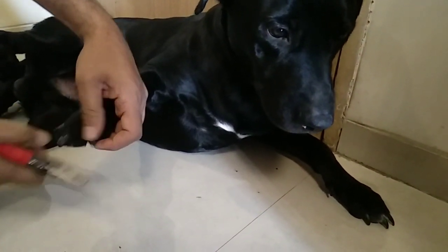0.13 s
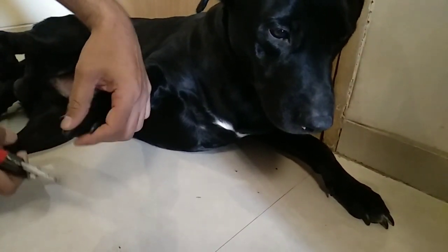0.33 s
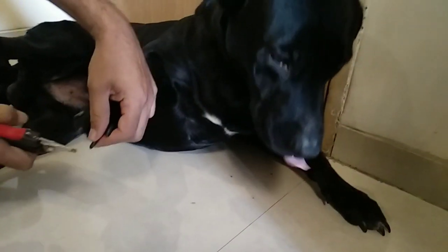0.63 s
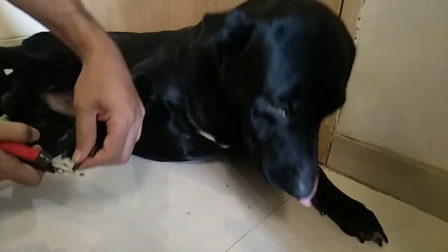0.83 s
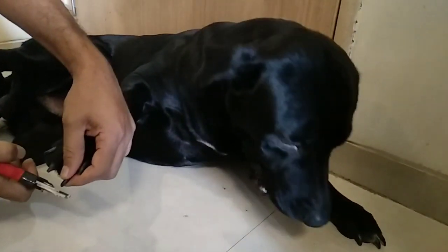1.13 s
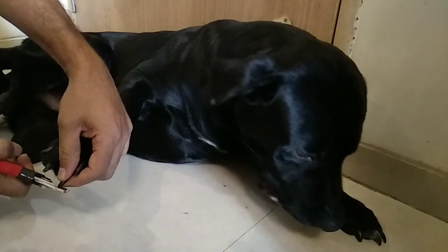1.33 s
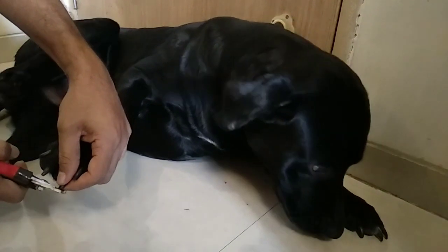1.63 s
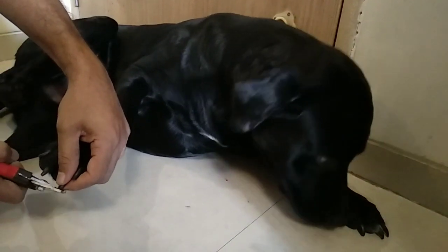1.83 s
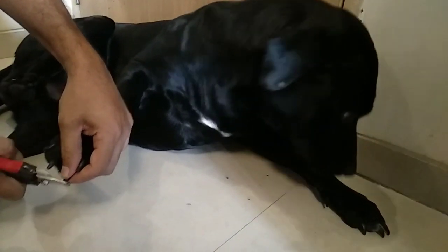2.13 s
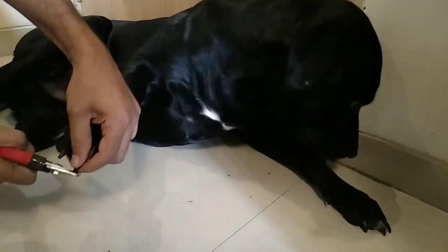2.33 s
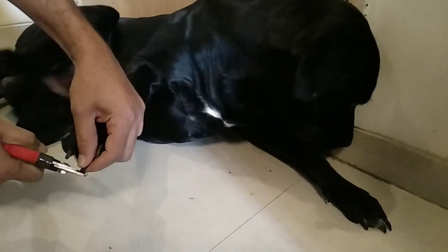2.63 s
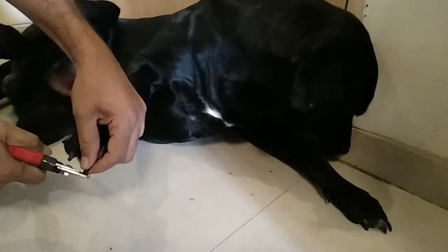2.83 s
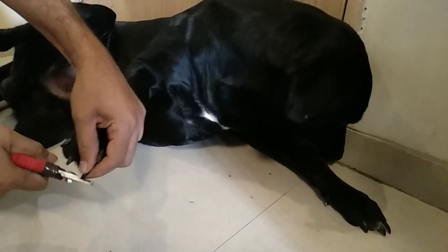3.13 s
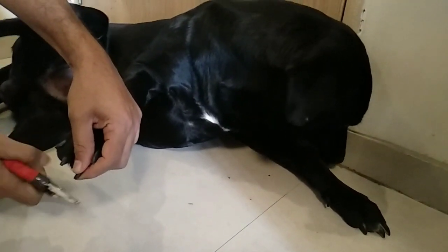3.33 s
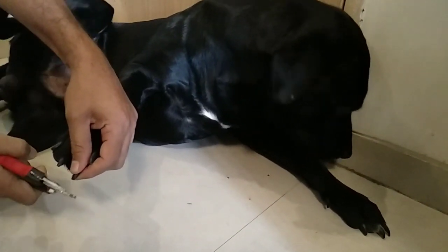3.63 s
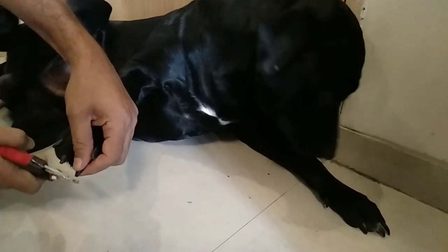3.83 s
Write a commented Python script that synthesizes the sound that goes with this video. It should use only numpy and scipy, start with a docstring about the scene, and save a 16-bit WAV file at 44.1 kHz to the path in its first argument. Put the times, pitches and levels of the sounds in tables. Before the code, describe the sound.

Nail clippers snap once through a dog's claw, sharp and crunchy, in a quiet tiled room

```python
"""Clipping a dog's claw

Plier-type clippers cut a claw close to a phone, in a small tiled room. Noise under a swelling envelope
makes the crunch, which ends in a snap; damped modes ring as the steel jaws and a single pulse jolts the hand.
Decaying noise, convolved with crunch and ring, is the answer of the room. Before and after, shaped noise
rustles as fur and fingers, soft bumps and two low modes boom faintly, and filtered noise is the quiet room."""
import sys
import numpy as np
from scipy import signal
from scipy.fft import rfft, irfft
from scipy.io import wavfile
from scipy.ndimage import uniform_filter1d

SR = 44100
rng = np.random.default_rng(int(sys.argv[2]) if len(sys.argv) > 2 else 0)


def store_wav(level_fs):
    """Save 16-bit WAV to argv[1]."""
    pcm = np.round(np.clip(np.atleast_2d(level_fs), -1, 1) * 32767)
    wavfile.write(sys.argv[1], SR, pcm.T.astype(np.int16))


N = 176400
T = np.arange(N) / SR  # time [s]
F = np.arange(N // 2 + 1) * SR / N + 1e-3  # frequency [Hz], kept above zero for logarithms

# Spectrum of the room noise: (frequency [Hz], relative level [dB])
AIR_SPECTRUM = [(30, -24), (60, -22), (90, -13), (135, 2), (190, -8.5), (270, -9.5), (325, -18.5),
                (400, -7), (480, -14), (690, -8), (930, -13.5), (1080, -22), (1320, -13), (1650, -13.5),
                (2300, -21.5), (2650, -19.5), (3000, -27), (4500, -29.5), (9000, -31), (12500, -33.5),
                (16000, -39.5)]
# Thin bands in the hiss: (frequency [Hz], half width [Hz], level before widening and panning [dB])
HISS_BANDS = [(10305, 140, -83), (13900, 150, -86)]
# Soft bumps on the floor: (time [s], level [dB], T60 [s])
FLOOR_BUMPS = [(.439, -48, 0.14), (.485, -60, 0.164), (1.972, -62.5, 0.15), (3.813, -53, .16)]
# Spectrum of a bump: (frequency [Hz], relative level [dB])
BUMP_SPECTRUM = [(50, -34), (100, -4.5), (140, 7.5), (250, -2.5), (340, -9), (600, -13), (950, -23),
                 (2000, -45), (8000, -56)]
# Swells of the room's low boom: (time [s], level of the lower mode [dB], half length [s])
BOOM_SWELLS = [(0.45, -56.5, 0.017), (0.502, -53, 0.026), (0.543, -55.5, 0.012), (.605, -59.5, 0.033),
               (0.972, -69, 0.1), (1.514, -66.5, 0.032), (1.997, -75, 0.049), (2.194, -69.5, 0.091),
               (3.87, -67, .06)]
# Strokes through fur: (time [s], level before RUSTLE_DB [dB], fall time [s], centre of scrape [Hz])
FUR_STROKES = [(0.083, -61, 0.025, 7000), (0.114, -64, 0.042, 4300), (.378, -64.5, 0.036, 2800),
               (0.544, -70, 0.063, 2400), (0.707, -64, 0.017, 8550), (0.766, -63.5, 0.02, 8500),
               (0.874, -70, 0.12, 8100), (0.966, -67, .022, 12500), (1.006, -73, 0.051, 10000),
               (1.183, -72.5, .12, 1700), (1.25, -68.5, 0.011, 6400), (1.363, -66, .025, 6460),
               (1.422, -69, .035, 12600), (1.468, -67, 0.017, 2800), (1.491, -65.5, 0.029, 10400),
               (1.54, -69, .035, 1900), (1.55, -68, .04, 5500), (1.795, -72.5, 0.03, 4500),
               (2.096, -71, .012, 6030), (2.37, -70.5, 0.022, 3800), (2.547, -69, .055, 2600),
               (2.672, -76.5, 0.077, 12000), (2.8, -74.5, 0.048, 4500), (3.55, -70, .035, 4000),
               (3.8, -72.5, 0.041, 3030), (3.92, -73, .02, 11000)]
# Spectrum common to all strokes: (frequency [Hz], relative level [dB])
RUSTLE_SPECTRUM = [(100, -50), (500, -45), (1500, 1.5), (3000, 1), (5000, -2), (8000, -1), (12000, -2.5),
                   (16000, -5.5)]
# Spectrum of the room's answer: (frequency [Hz], relative level [dB])
ROOM_SPECTRUM = [(90, -32), (135, -16), (200, -26), (290, -32), (390, -19), (480, -23), (570, -17),
                 (730, -17), (1030, -32), (1300, -13), (1620, -11), (2250, -13), (2700, -1), (3250, -1.5),
                 (3800, -2), (4600, -11), (5400, -6), (6800, -5), (10000, -12), (15500, -20)]
# Reverberation of the room: (frequency [Hz], T60 [s])
ROOM_DECAY = [(200, 0.46), (1500, 0.51), (3200, 0.45), (7000, .4), (14000, 0.29)]
# Modes of the steel jaws: (frequency [Hz], level relative to RING_DB [dB], T60 [s])
STEEL_MODES = [(1400, -17, .04), (1630, -8, .06), (2697, -13, .1), (2874, -8, .08), (3420, -11, .08),
               (3825, 0, .07), (4155, -9, .07), (5382, -6, .09), (5675, -10, .08), (6100, -9, .07),
               (6608, -7, .09), (6895, -8, .1), (8040, -8, .07), (10080, -14, .06)]
# Spectrum of the crunch: (frequency [Hz], relative level [dB])
CRUNCH_SPECTRUM = [(100, -13), (200, -8), (320, -16), (460, -7), (700, -10), (1000, -30), (1300, -7),
                   (1620, 1), (1800, -18), (2020, -2), (2320, -23), (2700, 1), (3200, -4), (3950, 6.5),
                   (4450, -7), (5400, 3), (6800, 1), (9000, -7), (10000, -4), (10600, -13), (11200, -8),
                   (13200, -20), (14400, -18), (15400, -7)]

WIDE_FROM_HZ, WIDE_FULL_HZ, WIDTH = 4400, 7000, .72  # stereo noise widens between these frequencies
RIPPLE_DB, RIPPLE_HZ = 3.5, 44.83  # nearby walls make faint sounds uneven in frequency

AIR_DB, AIR_SIDE, AIR_RIPPLE_DB = -69.5, 0.28, 2.4  # AIR_SIDE: share of side signal in the bass
AIR_PAN_DB = -4.5  # left level relative to right
AIR_WAVER_DB, AIR_WAVER_PER_S = 2, 22

BOOM_HZ, BOOM_WANDER, BOOM_WANDER_PER_S = 144, .05, 50  # wander is a fraction of the frequency
BOOM_UPPER_HZ, BOOM_UPPER_DB = 236, -13  # a second, weaker room mode

RUSTLE_DB, RUSTLE_GRAIN_DB = -0.87, 4
RUSTLE_ATTACK_SHARE = 0.62  # rise time as a share of the fall time
RUSTLE_CATCH_DB, RUSTLE_CATCH_PER_S = 1.56, 110
STROKE_COLOUR_DB, STROKE_COLOUR_HZ = 2.1, 300  # spectral ripple of each stroke
SCRAPE_DB, SCRAPE_OCTAVES = 9.5, .75  # height and width of each stroke's broad resonance
SCRAPE_SHIFT_DB, SCRAPE_SHIFT_PER_S = 2.3, 35

ROOM_DB, ROOM_BUILD_S, ROOM_HOLD_S, ROOM_SAG_DB_PER_S = -45.5, .014, 0.069, 5
ROOM_RIPPLE_DB, ROOM_RIPPLE_HZ, ROOM_GRAIN_DB = 2.4, 45, 2.5
RING_TO_ROOM_DB = -9  # gain of the ring on its way into the room

JOLT_S, JOLT_HALF_S, JOLT_DB = 3.1235, .0016, -11.5  # JOLT_DB scales a pulse that peaks near 0.32
SNAP_S = 3.1215
RING_DB, RING_LEAD_S, RING_BUILD_S = -14.5, .0085, .011
CRUNCH_START_S, BITE_S = 3.103, 0.0036  # the blades meet the claw and sink in
CRUNCH_DB, CRUNCH_RISE_S, CRUNCH_FALL_S, CRUNCH_SPREAD_DB = -12.5, .0072, 0.0065, 3
BREAK_S, BREAK_HALF_S, BREAK_DB = 3.1225, .003, -7  # the last fracture; level relative to the crunch

LOW_CUT_HZ, TOP_HZ = 90.6, 15900


def undb(db):
    """Logarithmic level: decibels become an amplitude ratio."""
    return 10 ** (np.asarray(db) / 20)


def unit(x):
    """Normalization: scale to a root-mean-square value of 1."""
    return x / np.sqrt(np.mean(x ** 2))


def along(points, hz):
    """Interpolation of (frequency, value) points on a logarithmic frequency axis."""
    p = np.array(points, float)
    return np.interp(np.log(hz), np.log(p[:, 0]), p[:, 1])


def colour(x, gain):
    """Linear filtering by a gain curve that keeps the power of white noise."""
    return irfft(rfft(x) * unit(gain), N)


def split_bands(spectrum, centres):
    """Filter bank: overlapping triangular bands that add up to the whole."""
    for pick in np.eye(len(centres)):
        yield irfft(spectrum * np.interp(F, centres, pick), N)


def walk(rate):
    """Low-pass noise: a smooth random drift with an rms of 1."""
    k = int(SR / rate)
    steps = np.repeat(rng.standard_normal(N // k + 1), k)
    smooth = uniform_filter1d(uniform_filter1d(steps, k), k)
    return unit(smooth[:N])


def ripple(depth_db, spacing_hz):
    """Spectral irregularity: random peaks and dips along the frequency axis."""
    knots = np.arange(0, SR / 2, spacing_hz)
    return undb(depth_db * np.interp(F, knots, rng.standard_normal(len(knots))))


def widen(pair, low_side=0):
    """Mid-side stereo: two noises give ears more alike in the bass and wide in the treble."""
    mid, side = pair
    share = np.interp(F, [WIDE_FROM_HZ, WIDE_FULL_HZ], [low_side, WIDTH])
    side = irfft(rfft(side) * share, N)
    return np.array([mid + side, mid - side])


def stereo_noise(low_side=0):
    """Partial coherence: steady white noise spread over both ears."""
    return widen(rng.standard_normal((2, N)), low_side)


def grains(spread_db, size=12):
    """Granular noise: a random strength for every few samples (size)."""
    strength = np.repeat(undb(spread_db * rng.standard_normal(N // size + 1)), size)[:N]
    return widen(rng.standard_normal((2, N)) * unit(strength))


def fade(age, t60):
    """Exponential decay from age 0, by 60 dB in t60 seconds."""
    return (age >= 0) * np.exp(-np.log(1000) * np.maximum(age, 0) / t60)


def ring(start, modes):
    """Modal superposition: damped sinusoids struck at one moment."""
    age = T - start
    return sum(undb(db) * fade(age, t60) * np.sin(2 * np.pi * hz * age) for hz, db, t60 in modes)


def air():
    """Filtered noise: each band of the room wavers by itself, stronger on the right, with two thin hiss bands."""
    gain = undb(along(AIR_SPECTRUM, F)) * ripple(AIR_RIPPLE_DB, RIPPLE_HZ)
    spectrum = rfft(stereo_noise(AIR_SIDE)) * unit(gain)
    bed = 0
    for band in split_bands(spectrum, np.geomspace(100, 12000, 24)):
        bed = bed + band * undb(AIR_DB + AIR_WAVER_DB * walk(AIR_WAVER_PER_S))
    hiss = stereo_noise()
    thin = sum(undb(db) * colour(hiss, np.exp(-((F - hz) / width) ** 2)) for hz, width, db in HISS_BANDS)
    pan = undb(np.array([[AIR_PAN_DB], [-AIR_PAN_DB]]) / 2)
    return (bed + thin) * pan


def boom_mode(hz):
    """Frequency modulation: a room mode whose pitch wanders at random."""
    wandering_hz = hz * (1 + BOOM_WANDER * walk(BOOM_WANDER_PER_S))
    return np.sin(2 * np.pi * np.cumsum(wandering_hz) / SR)


def booms():
    """Low room modes: two wavering tones share Gaussian swells."""
    swell = sum(undb(db) * np.exp(-((T - s) / half) ** 2) for s, db, half in BOOM_SWELLS)
    modes = boom_mode(BOOM_HZ) + undb(BOOM_UPPER_DB) * boom_mode(BOOM_UPPER_HZ)
    return np.sqrt(2) * swell * modes  # the root makes a sine's rms 1


def bumps():
    """Damped impact: soft dull knocks on the floor are decaying noise, coloured low."""
    knocks = sum(undb(db) * fade(T - s, t60) for s, db, t60 in FLOOR_BUMPS)
    return colour(rng.standard_normal(N) * knocks, undb(along(BUMP_SPECTRUM, F)))


def rustles():
    """Friction noise: fingers and clippers brush fur in grainy strokes that catch and slip, shifting in colour."""
    catch = unit(undb(RUSTLE_CATCH_DB * walk(RUSTLE_CATCH_PER_S)))
    fur = rfft(grains(RUSTLE_GRAIN_DB, size=30) * catch) * unit(ripple(RIPPLE_DB, RIPPLE_HZ))
    shape = along(RUSTLE_SPECTRUM, F)
    strokes = 0
    for s, db, length, hz in FUR_STROKES:
        envelope = np.exp(-np.abs(T - s) / (length * np.where(T < s, RUSTLE_ATTACK_SHARE, 1)))
        scrape = SCRAPE_DB * np.exp(-(np.log2(F / hz) / SCRAPE_OCTAVES) ** 2)
        gain = undb(shape + scrape) * ripple(STROKE_COLOUR_DB, STROKE_COLOUR_HZ)
        strokes = strokes + undb(db) * envelope * irfft(fur * unit(gain), N)
    shifting = 0
    for band in split_bands(rfft(strokes), np.geomspace(1500, 15000, 12)):
        shifting = shifting + band * undb(SCRAPE_SHIFT_DB * walk(SCRAPE_SHIFT_PER_S))
    return undb(RUSTLE_DB) * shifting


def room(x):
    """Reverberation: uneven dense reflections build, hold briefly and die away, the high treble soonest."""
    early = (1 - np.exp(-T / ROOM_BUILD_S)) * undb(-ROOM_SAG_DB_PER_S * np.minimum(T, ROOM_HOLD_S))
    late = np.maximum(T - ROOM_HOLD_S, 0)
    gain = undb(along(ROOM_SPECTRUM, F)) * ripple(ROOM_RIPPLE_DB, ROOM_RIPPLE_HZ)
    wash = rfft(grains(ROOM_GRAIN_DB, size=40)) * unit(gain)
    bands = split_bands(wash, [hz for hz, _ in ROOM_DECAY])
    tail = sum(band * fade(late, t60) for band, (_, t60) in zip(bands, ROOM_DECAY))
    return undb(ROOM_DB) * signal.fftconvolve(x, early * tail, axes=1)[:, :N]


def jolt():
    """Impulse: the handles jump shut and stop dead in the hand, a short dull knock of two opposite lobes."""
    u = (T - JOLT_S) / JOLT_HALF_S
    return undb(JOLT_DB) * u / (1 + u ** 2) ** 2


def jaws():
    """Damped resonance: the steel jaws start to ring as the claw gives way; the hand soon damps them."""
    start = SNAP_S - RING_LEAD_S
    build = np.clip((T - start) / RING_BUILD_S, 0, 1)
    return undb(RING_DB) * ring(start, STEEL_MODES) * build


def claw():
    """Brittle fracture: grainy noise grows exponentially as the claw crunches, then it breaks."""
    age = T - SNAP_S
    effort = np.exp(-np.abs(age) / np.where(age < 0, CRUNCH_RISE_S, CRUNCH_FALL_S))
    bite = np.clip((T - CRUNCH_START_S) / BITE_S, 0, 1)
    fracture = undb(BREAK_DB) * np.exp(-((T - BREAK_S) / BREAK_HALF_S) ** 2)
    return undb(CRUNCH_DB) * grains(CRUNCH_SPREAD_DB) * (effort * bite + fracture)


def scene():
    """Superposition: the snap and its reverberation add to the faint sounds of handling."""
    background = air() + booms() + bumps() + rustles()
    crack, steel = claw(), jaws()
    crunch = colour(crack, undb(along(CRUNCH_SPECTRUM, F))) * (T > CRUNCH_START_S)
    answer = room(crack + undb(RING_TO_ROOM_DB) * steel)
    return background + answer + jolt() + steel + crunch


def record(dry):
    """Band limiting: the phone cuts the deep bass and the top."""
    low_cut = signal.butter(N=4, Wn=LOW_CUT_HZ, btype="high", fs=SR, output="sos")
    top_cut = signal.ellip(10, .2, 80, TOP_HZ, fs=SR, output="sos")  # order, ripple [dB], rejection [dB]
    return signal.sosfilt(top_cut, signal.sosfilt(low_cut, dry))


dry = scene()
out = record(dry)
store_wav(out)
```